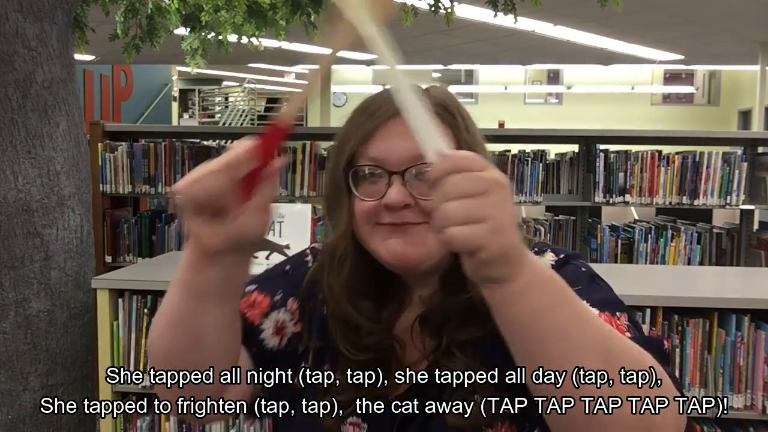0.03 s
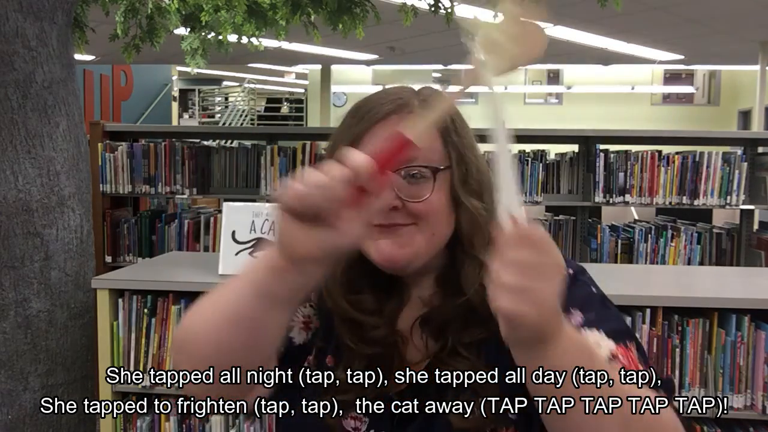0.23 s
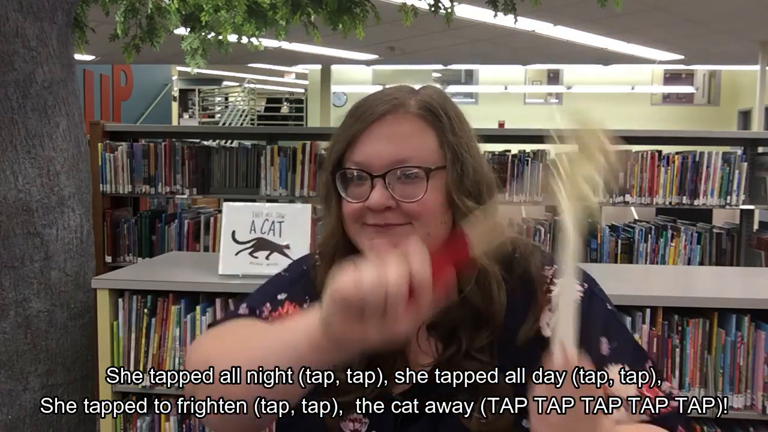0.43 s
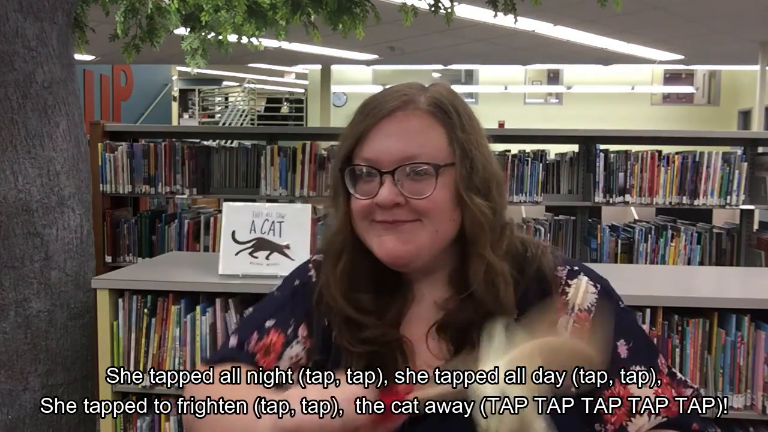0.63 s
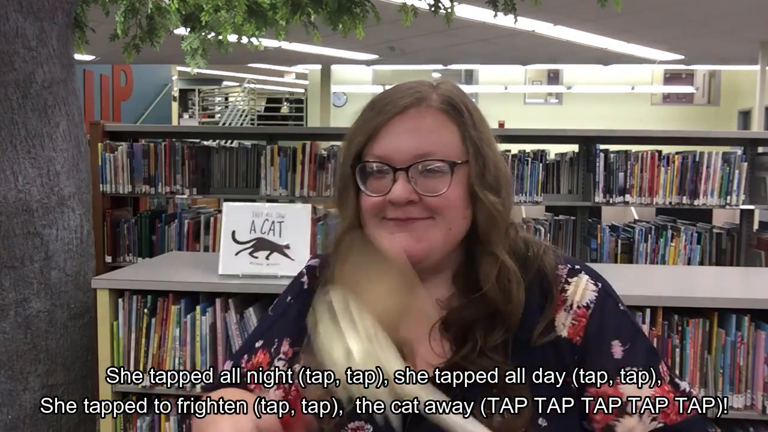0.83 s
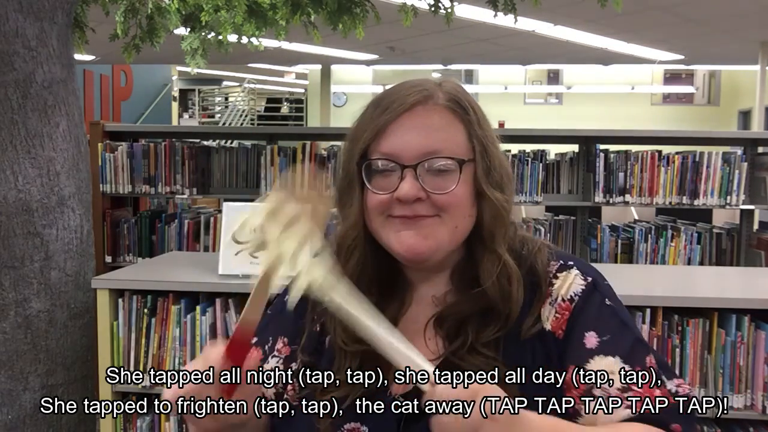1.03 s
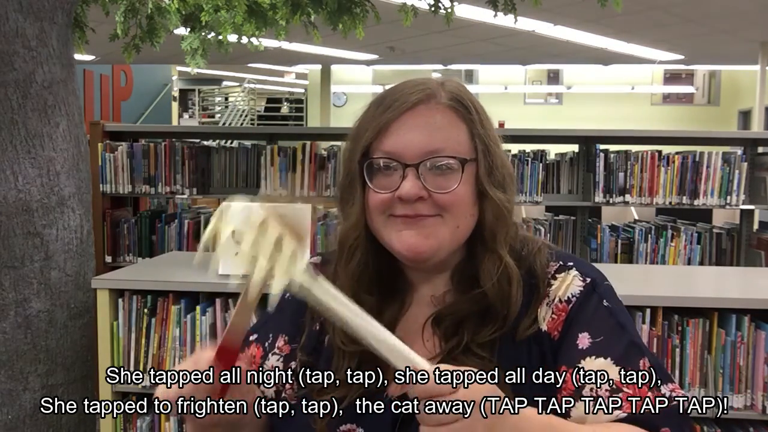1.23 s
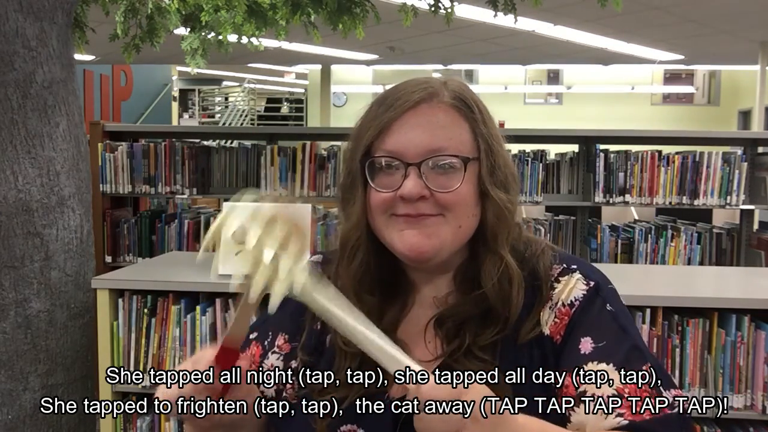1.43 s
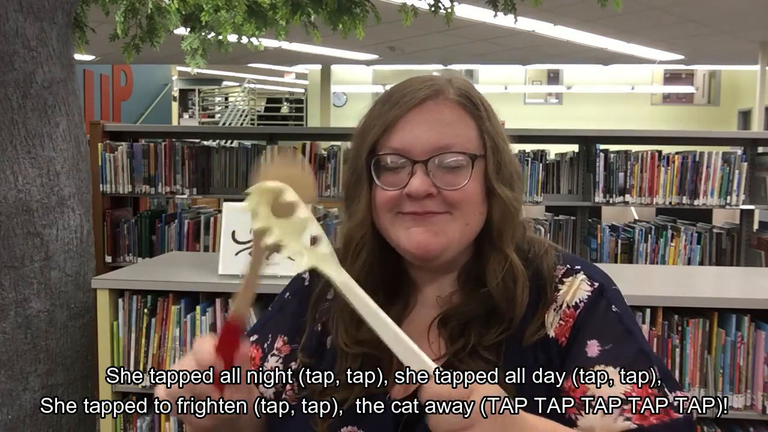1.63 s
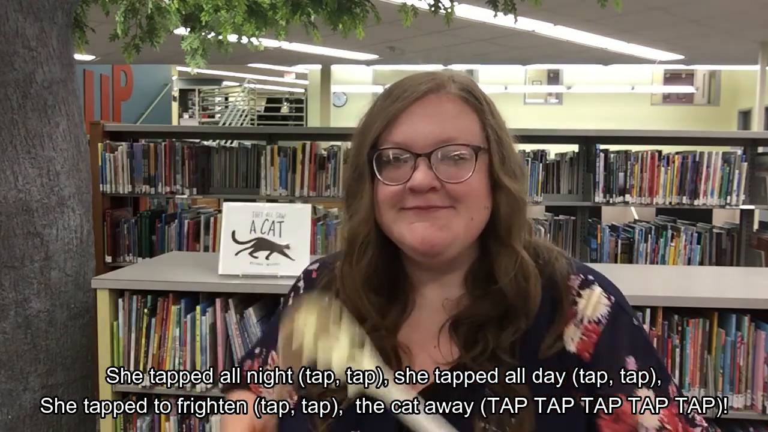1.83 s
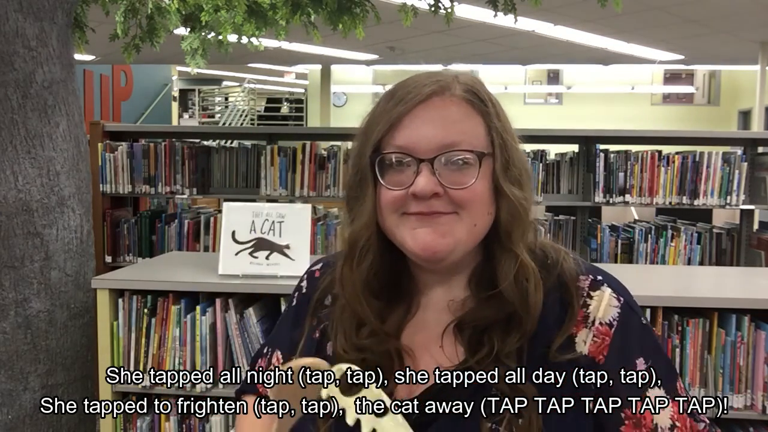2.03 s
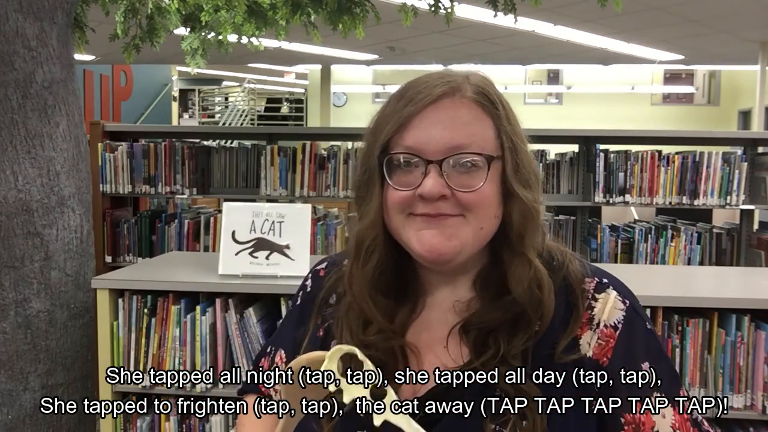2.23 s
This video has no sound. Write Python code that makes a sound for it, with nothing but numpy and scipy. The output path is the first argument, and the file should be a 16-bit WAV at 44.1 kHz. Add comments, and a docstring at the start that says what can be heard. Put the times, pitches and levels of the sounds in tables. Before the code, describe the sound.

Sharp clacks come in a fast, steady run as a wooden spoon hits a plastic utensil close to the microphone. A few bounce, and the last is faint. Ventilation rumbles softly in the quiet, damped room.

```python
"""Spoon and spatula clacks

A wooden spoon and a plastic spatula are clacked together close to a microphone in a quiet, damped room.
Each impact makes a broadband crack and excites the same short-lived modes, weighted by the point of
contact; some blows bounce or rattle. Hard blows overload the microphone; ventilation rumbles underneath."""
import sys
import numpy as np
from scipy import signal
from scipy.fft import irfft
from scipy.io import wavfile

SR = 44100
rng = np.random.default_rng(int(sys.argv[2]) if len(sys.argv) > 2 else 0)


def generate_wav(signal):
    """Clip the signal to [-1, 1] and save it as 16-bit WAV at the path in sys.argv[1]."""
    frames = np.transpose(np.atleast_2d(signal))
    scaled = np.clip(frames, -1, 1) * 32767
    pcm = np.round(scaled).astype(np.int16)
    wavfile.write(sys.argv[1], SR, pcm)


N = 100151


def amp(db):
    """Amplitude ratio of a level in decibels."""
    return 10 ** (np.asarray(db) / 20)


def noise(spectrum, size):
    """Random-phase noise of unit rms, shaped by (f/Hz, level/dB) points and rolling off beyond them."""
    hz, db = np.array(spectrum).T
    f = np.maximum(np.fft.rfftfreq(size, 1 / SR), 1)
    skirts = np.minimum(f / hz[0], 1) ** 2 * np.minimum(hz[-1] / f, 1) ** 2
    gain = amp(np.interp(np.log(f), np.log(hz), db)) * skirts
    y = irfft(gain * np.exp(2j * np.pi * rng.random(len(f))), size)
    return y / y.std()


def decay(t, t60):
    """Exponential damping: 60 dB down at t60."""
    return np.exp(-np.log(1000) * t / t60)


def lowpass(x, hz):
    """Zero-phase filtering: a first-order low-pass run forward and backward."""
    return signal.sosfiltfilt(signal.butter(1, hz, fs=SR, output="sos"), x, padtype=None)


def add(out, sound, start_s):
    """Superposition: mix a sound in at start_s, dropping what falls outside the span."""
    i = int(start_s * SR)
    part = sound[max(-i, 0):len(out) - i]
    out[max(i, 0):max(i, 0) + len(part)] += part


# Spectra of the ventilation's rumble and air rush: f/Hz, spectral level/dB
RUMBLE_SPECTRUM = [(26, 1.5), (35, 4), (44, -4), (60, -7), (90, -16), (112, -17.5), (140, -26), (180, -21),
                   (240, -27)]
AIR_SPECTRUM = [(150, 9.5), (220, -15.5), (330, -19.5), (600, -17.5), (1500, -19.5), (4000, -31),
                (9000, -26.5), (16000, -38)]

def ventilation():
    """Stationary noise: a deep rumble with a faint rush of air above it."""
    return amp(-29) * noise(RUMBLE_SPECTRUM, N) + amp(-55) * noise(AIR_SPECTRUM, N)


# Centres of the seven bands weighted by the point of contact: f/Hz
BANDS_HZ = (1300, 2300, 3270, 4340, 5400, 6500, 9000)

def contact_weighting(bands_db, body_db):
    """Modal excitation depends on where a blow lands: returns level/dB as a function of f/Hz."""
    def contact_db(f):
        low_shelf = body_db * np.clip(np.log2(BANDS_HZ[0] / f), 0, 1)
        return low_shelf + np.interp(np.log(f), np.log(BANDS_HZ), bands_db)
    return contact_db


def weighted(spectrum, gain_db):
    """Spectral weighting: gains multiply, so their levels add."""
    hz, db = np.array(spectrum).T
    return [(f, np.interp(np.log(f), np.log(hz), db) + gain_db(f)) for f in np.union1d(hz, BANDS_HZ)]


# Spectrum of the diffuse field: f/Hz, spectral level/dB
ROOM_SPECTRUM = [(200, -15), (450, -1.5), (1000, 0.5), (1600, -3), (2500, 2), (5000, -3), (8300, -3),
                 (11000, -15), (16000, -21)]

def reverberation(contact_db):
    """Diffuse reflection: early sound, then a tail whose treble dies first, both coloured by the blow."""
    t = np.arange(SR * 3 // 4) / SR
    spectrum = weighted(ROOM_SPECTRUM, lambda f: 0.4 * contact_db(f))
    diffuse = noise(spectrum, len(t))
    low = lowpass(diffuse, hz=14700)
    tail = low * decay(t, t60=0.71) + (diffuse - low) * decay(t, t60=0.32)
    tail *= 1 - np.exp(-(t / 0.059) ** 2)  # gradual build-up
    early = noise(weighted(spectrum, lambda f: -1.5 * np.log2(f)), len(t))  # -1.5 dB per octave
    early *= decay(t, t60=0.22) * (1 - np.exp(-(t / 0.0029) ** 2))
    return amp(-20) * tail / np.linalg.norm(tail) + amp(-3.5) * early / np.linalg.norm(early)


# Spectrum of the contact transient: f/Hz, spectral level/dB
CRACK_SPECTRUM = [(150, -14.5), (450, 6.5), (1000, 8.5), (2500, 10.5), (5000, 3), (8500, 6), (11500, -4.5),
                  (16000, -12)]

def contact_crack(t, contact_db):
    """Impact transient: a brief contact radiates a broadband burst."""
    spectrum = weighted(CRACK_SPECTRUM, lambda f: 0.7 * contact_db(f))
    return amp(-8) * noise(spectrum, len(t)) * decay(t, t60=0.012)


# Nominal natural frequencies of the two utensils: f/Hz
MODE_FREQUENCIES = [430, 560, 720, 1270, 1560, 2305, 2600, 3255, 3780, 4310, 5640, 6440, 7560, 8220, 9100,
                    10300, 11860]
# Nominal strength and damping of each mode: level/dB, T60/s
MODE_DECAYS = [(-14, 0.013), (-15.0, 0.018), (-19, 0.0237), (-15, 0.025), (-24, 0.014), (-7.5, 0.021),
               (-9.5, 0.0073), (-4.0, 0.014), (-7.5, 0.0082), (-8.5, 0.016), (-18, 0.013), (-12.5, 0.011),
               (-13.5, 0.0106), (-8, 0.0086), (-11, 0.0045), (-16, 0.0092), (-18.5, 0.0071)]
HIGH_MODES_HZ = 2800

def utensil_ring(t, contact_db, low_pitch, high_pitch, t60_ratio):
    """Free vibration: a sum of damped normal modes of alternating polarity."""
    hz = np.array(MODE_FREQUENCIES)[:, None]
    db, t60 = np.array(MODE_DECAYS).T[:, :, None]
    polarity = (-1) ** np.arange(len(hz))[:, None]
    pitch = np.where(hz < HIGH_MODES_HZ, low_pitch, high_pitch)
    envelopes = amp(db + contact_db(hz)) * decay(t, t60 * t60_ratio)
    return (polarity * envelopes * np.sin(2 * np.pi * hz * pitch * t)).sum(0)


# Blows, bounces and their short reflections and echoes: t/s, level/dB, seven band weights/dB, crack/dB,
# low-mode frequency ratio, high-mode frequency ratio, T60 ratio, room/dB, low body/dB
CLACKS = [ (-.075, 9.5, 0, 6.5, 1.5, -2, -8.5, -6.5, -8, -2, .9, 0.94, 1.2, .5, -23),
          (0.0855, 8, -12.5, 5.5, 4, 2, -3, -8, -1.5, 7, 1.014, 1.012, 0.98, 0, -8.5),
          (0.2325, 1.5, -6, 5.5, 1, -1, -7.5, -11.5, -13.5, 5, 0.95, 1.006, 1.18, 1, -1.5),
          (.3772, 8.5, -3, 3.5, 0.5, -9.5, 9, 3, -18.5, 3.5, 1.01, 1.03, 1.1, -4, -10),
          (0.3861, -3, -2.5, 3.5, 1.5, -2, 8, 6.5, -3.5, -12, 1.02, 0.98, 0.83, 1.5, -2),
          (.5416, 7, 7, 4, 2.5, -7.5, -10.5, 1, -4.5, 0.5, 1.025, 0.97, 0.82, -4, -11),
          (0.6914, 9, 6, 0, 0, -4, 0.5, 3.5, -10.5, -1.5, 0.97, 1, 0.87, -8, -6.5),
          (0.7232, -24.5, 9.5, 1, -9, -5.5, -8, -4, -19, 9, 1.01, .994, 1.7, 6, 4.5),
          (.8224, 2, 5, 5.5, -2.5, -6.5, -16, 7.5, -4, -2, 1.01, 1.014, 0.83, -4.5, -1.5),
          (0.8417, 0, 3.5, -2.5, -4.5, -2, 0.5, 8.5, -2.5, -2, 0.9, 1, 0.79, -14.5, -3),
          (.85, -15, 13.5, 6, -15, -8, -5.5, 1, -9, 2, 1.02, 0.98, 1.17, -4.5, -9),
          (0.9526, -16, 12, 6, 1.5, 1.5, -14, -5.5, -12, 2, 1.04, 0.95, 0.61, 6, 0.5),
          (0.9829, -26, 11.5, 5, -7.5, -17, -.5, 4, -12, 8, 1.01, 0.94, 1.03, -9, 5.5),
          (0.9936, -28.5, 11.5, 7, -2, -16, -3, -2, -10, 4, .96, 1, 1.02, -10, 7),
          (1.0138, -26.5, 13, 9, -0.5, -14, -15, 4.5, -20, 10, 1.025, 0.98, 0.95, -2, -8.5),
          (1.1641, 7, -2, -3, -9.5, 3.5, 2, 0.5, 6.5, -1, 0.97, 1, 0.67, -4, 2),
          (1.1717, -14.5, -5.5, -1.5, -7.5, -5, -6, -2, -11, 10, 1.1, 0.95, 1.9, -7, 3.5),
          (1.3102, 9.5, -3, -4.5, -5, -8, -3.5, 7, 2.5, 4, 0.98, .93, 0.93, -2.5, -2),
          (1.4648, 9, -8, -2.5, -11.5, -4, 4.5, 8.5, -1, 5, 1.023, 1, 0.86, -3.5, 3.5),
          (1.4721, -9, -3, 2.5, -8, -3.5, 0.5, 4.5, -5.5, 4.5, 1.05, .992, 0.8, -8.5, 5.5),
          (1.4897, -13, 2.5, -3.5, -9, -6, -4.5, -0.5, -12, 11, 0.94, 1.004, 2.6, 8, 2),
          (1.6252, 11.5, 2.5, -5, 0.5, 5.5, -2, 6, 1, 2, 0.97, 1.023, 1.28, 2, -14.5),
          (1.6326, -5, 0, -4, -2, -2.5, 0, 1.5, -14, 4.5, 1.01, 0.9, 2.3, -5.5, -7.5),
          (1.641, -8.5, 1, -2.5, -7, 0, -0.5, .5, -6.5, 7.5, 0.97, 1.05, 2, 1, -5.5),
          (1.657, -17.5, 3.5, -6, -9.5, 5.5, 4, 0, -6.5, 7, .97, 1.005, 4, -8, -4),
          (1.6881, -14, 2, -2, 3, 5.5, -10, 5.5, -14.5, 9, 0.92, 0.97, 1.4, -1, -9),
          (1.8953, 3, -5.5, -2, -0.5, -3, -9, 4, -7, 4.5, 1.02, .99, 1.06, -3.5, -6.5),
          (2.1356, -17, 5.5, 4.5, 6.5, 1.5, -8, -3.5, -17, 7, 0.98, 0.94, 1.02, 5, -7.5)]
CONTACT_RISE_S, ECHO_DELAY_S = 0.00042, 0.031

def clacks():
    """Impulsive excitation: each blow cracks and rings, followed by a dull wall echo and reverberation."""
    out = np.zeros(N)
    t = np.arange(SR // 16) / SR
    attack = 1 - np.exp(-t / CONTACT_RISE_S)
    for start, level_db, *bands_db, crack_db, low_pitch, high_pitch, t60_ratio, room_db, body_db in CLACKS:
        contact_db = contact_weighting(bands_db, body_db)
        ring = utensil_ring(t, contact_db, low_pitch, high_pitch, t60_ratio)
        crack = amp(crack_db) * contact_crack(t, contact_db)
        clack = amp(level_db) * (ring + crack) * attack
        reverb = reverberation(contact_db)
        ring_reverb = amp(-29.5) * signal.fftconvolve(reverb, ring)[:len(reverb)]
        add(out, clack, start)
        add(out, amp(-19) * lowpass(clack, hz=1093), start + ECHO_DELAY_S)
        add(out, amp(level_db + room_db) * (reverb + ring_reverb), start)
    return out


def scene():
    """Superposition of the clacks and the ventilation in one channel."""
    return (clacks() + ventilation())[None]


def record(dry):
    """Saturation and band limiting: the microphone flattens hard blows and cuts the top of the treble."""
    ceiling, knee, cutoff_hz = 0.89, 4.9, 16100
    saturated = dry / (1 + np.abs(dry / ceiling) ** knee) ** (1 / knee)
    return signal.sosfiltfilt(signal.butter(10, cutoff_hz, fs=SR, output="sos"), saturated)


dry = scene()
out = record(dry)
generate_wav(out)
```